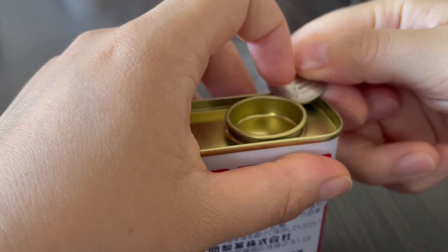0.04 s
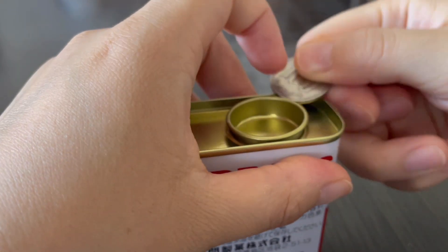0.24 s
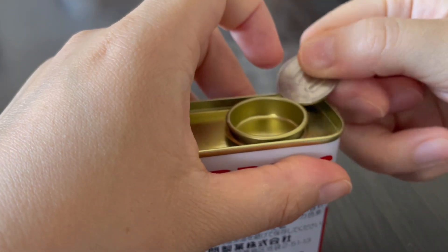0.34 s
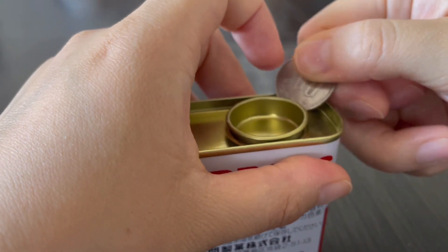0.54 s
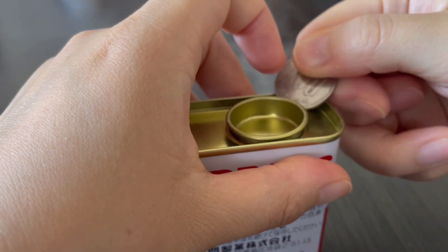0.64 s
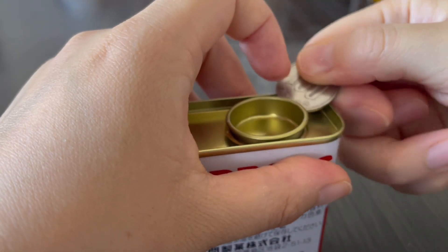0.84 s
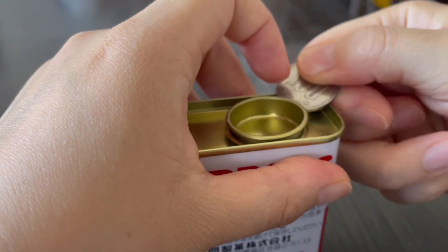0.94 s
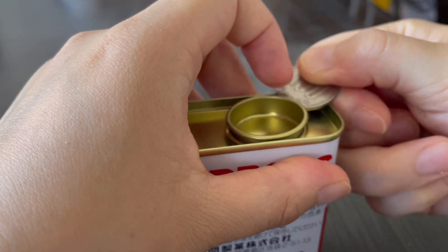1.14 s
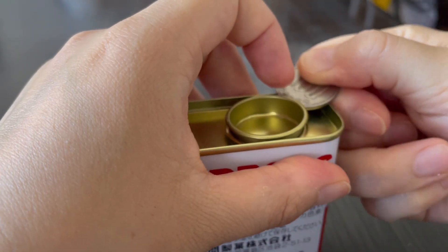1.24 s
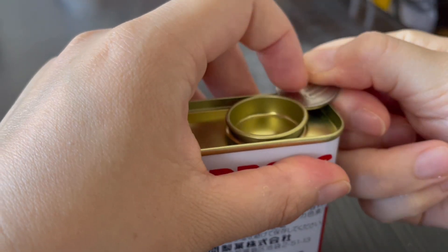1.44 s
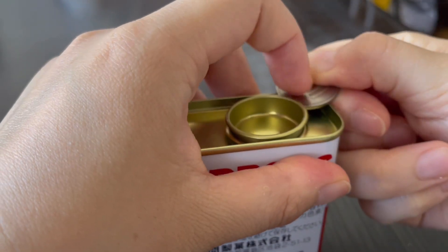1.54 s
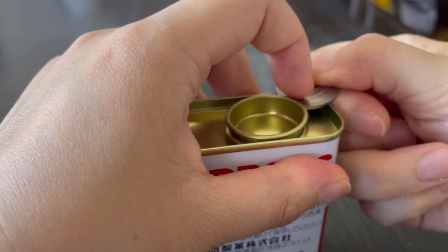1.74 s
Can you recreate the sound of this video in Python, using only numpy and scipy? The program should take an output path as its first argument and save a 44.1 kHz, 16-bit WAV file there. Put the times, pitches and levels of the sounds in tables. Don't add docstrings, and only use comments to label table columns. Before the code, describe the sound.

Close and dry, a coin edge settles faintly on thin metal, knocks, snaps sharply, drags in quick catching clicks, pauses, taps crisply, then leaves near silence with tiny touches in a small quiet room.

```python
import sys
import numpy as np
from scipy import signal
from scipy.io import wavfile
from scipy.ndimage import uniform_filter1d

SR = 44100
rng = np.random.default_rng(int(sys.argv[2]) if len(sys.argv) > 2 else 0)


def transcribe(signal):
    frames = np.atleast_2d(signal).T
    limited = np.clip(frames, -1, 1)
    pcm = np.round(limited * 32767).astype(np.int16)
    wavfile.write(sys.argv[1], SR, pcm)


def natural_amplitude(level_db):
    exponent = np.asarray(level_db, float) / 20
    return 10 ** exponent


N = 79380

# frequency in Hz, level in dB, t60 in seconds.
WALL = [(695, -16, 0.069), (1000, -13, 0.01188), (1330, -0.5, 0.0092), (1620, -4, 0.017),
        (1737, -4.5, 0.01), (1847, -6.5, 0.026), (2007, -4, 0.019), (2161, -5, 0.012), (2285, -8, 0.012),
        (3947, -8, 0.0059), (5944, -9, 0.0057), (7644, -12.5, 0.0063)]


def evened(x):
    return x / np.sqrt(np.mean(x ** 2) + 1e-20)


def read(points, hz):
    f, value = np.transpose(points)
    return np.interp(np.log(hz + 1), np.log(f + 1), value)


def add(mix, s, sound):
    part = mix[round(s * SR):][:len(sound)]
    part += sound[:len(part)]


def ring(modes, rise):
    t = np.arange(8192) / SR
    hz, db, t60 = np.transpose(modes)[:, :, None]
    treble_rise = 0.36
    swell = (1 - np.exp(-t / rise * (hz / 2000) ** treble_rise)) ** 2
    sign = (-1.) ** np.arange(len(modes))[:, None]
    return (sign * swell * natural_amplitude(db - 60 * t / t60) * np.sin(2 * np.pi * hz * t)).sum(0)


def contacts(rows, modes):
    out, t = np.zeros(N), np.arange(8192) / SR
    crack_t60, shimmer_t60, shimmer_db = 0.014, 0.21, -25
    band = signal.butter(4, [1100, 14300], "bandpass", fs=SR, output="sos")
    fall = natural_amplitude(-60 * t / crack_t60) + natural_amplitude(shimmer_db - 60 * t / shimmer_t60)
    fall = fall * (1 - np.exp(-t / 0.000067))
    for s, db, rise, crack_db in rows:
        crack = fall * signal.sosfilt(band, rng.standard_normal(len(t)))
        add(out, s, natural_amplitude(db) * (ring(modes, rise) + natural_amplitude(crack_db) * crack))
    return out


def scrape(pressure, modes, rise):
    out = np.zeros(N)
    grains_per_s, grain_db = 450, 0
    for mode in modes:
        size = natural_amplitude(grain_db * np.minimum(rng.exponential(1, N), 4)) * rng.choice([-1., 1.], N)
        grains = size * (rng.random(N) < grains_per_s / SR)
        out += signal.oaconvolve(grains, ring([mode], rise))[:N]
    s, db = np.transpose(pressure)
    return evened(out) * natural_amplitude(np.interp(np.arange(N) / SR, s, db, -120, -120))


def air():
    # frequency in Hz, density in dB per Hz.
    spectrum = [(7.1, -39.5), (12, -4.5), (59, -11.5), (82, -17.5), (186, -19), (301, -22.5), (502, -27.5),
                (13400, -38.5), (16000, -38.5)]
    level_db, hiss_top_hz, hiss_drop_db = -64.5, 15930, -17
    frames, hz = N // 512 + 6, np.fft.rfftfreq(2048, 1 / SR)
    a, b, patches = rng.standard_normal((frames, 1025, 3)).T
    patches = uniform_filter1d(patches, size=20, axis=0)
    patches = evened(uniform_filter1d(patches, size=8, axis=1))
    drop = hiss_drop_db * (hz > hiss_top_hz)
    z = (a + 1j * b) * natural_amplitude((read(spectrum, hz) + drop)[:, None] + 1.1 * patches)
    noise = signal.istft(z, nperseg=2048, noverlap=1536)[1][:N]
    return natural_amplitude(level_db) * evened(noise)


def jolts():
    times = [.046, .055, .082, .219, .2185, .32, .41, .632, .705, .7065, .708, .742, 1.37, 1.541]
    # peak in dB, pitch in Hz, length in seconds (to -30 dB).
    puffs = [(-56.5, 273, 0.054), (-60.5, 148, 0.081), (-56, 414, 0.079), (-51.5, 227, 0.04),
             (-33.5, 720, .015), (-57, 840, 0.019), (-63.5, 410, 0.039), (-59.5, 680, 0.017),
             (-54, 120.5, 0.029), (-50, 510, 0.035), (-57, 255, 0.029), (-60, 455, 0.069),
             (-60, 486, 0.042), (-62, 207, 0.059)]
    out, t = np.zeros(N), np.arange(4096) / SR
    for s, (db, hz, length) in zip(times, puffs):
        noise = rng.standard_normal(2 * len(t))
        b, a = signal.butter(2, [hz / 1.2, hz * 1.3], "bandpass", fs=SR)
        puff = signal.lfilter(b, a, noise)[len(t):]
        puff = natural_amplitude(-30 * t / length) * (1 - np.exp(-t * hz / 0.79)) * puff
        add(out, s, natural_amplitude(db) * puff / abs(puff).max())
    return out


def setting_down():
    # frequency in Hz, level in dB, t60 in seconds.
    rim = [(547.6, -8.5, .01), (896.6, -11, 0.012), (1350, -4.5, 0.01), (2110, -4.5, 0.0081),
           (4070, -11.5, 0.0072), (5650, -5.5, 0.0038), (9300, -8, 0.0039), (10200, -9, 0.0055),
           (13000, -14, .004)]
    # start in seconds, strength in dB, rise in seconds, crack in dB.
    landing = [
        (.0503, -58, 0.00094, 1),
    ]
    # time in seconds, level in dB.
    pressure = [(.049, -82), (.051, -60), (.066, -63), (.078, -60.5), (.093, -67.5), (.1, -72.5),
                (.13, -76.5), (.15, -90.5)]
    return contacts(landing, rim) + scrape(pressure, rim, 0.00048)


def brush():
    # time in seconds, level in dB.
    pressure = [(.07, -81), (.1, -71.5), (.15, -69.5), (.17, -63), (.215, -76), (.58, -93), (.6, -72),
                (.63, -77), (.65, -95)]
    return scrape(pressure, WALL, 0.0012)


def knocks():
    # frequency in Hz, level in dB, t60 in seconds.
    modes = [(438.2, -21, 0.013), (596, -15.5, 0.0121), (898, -18.5, 0.011), (1380, -8.5, 0.01216),
             (1871, 5.5, 0.011), (1950, -18, .04), (2673, -37, 0.0098), (3850, -20.5, .008),
             (4600, -24.5, 0.008), (5370, -19.5, 0.00813), (7164, -28, .008), (9940, -21, 0.005),
             (13570, -28.5, .008)]
    # start in seconds, strength in dB, rise in seconds, crack in dB.
    rows = [
        (.1524, -26, 0.00058, -21),
        (.1685, -56, .0012, -39),
        (.2146, -33, 0.001026, -32.5),
        (.2172, -29, 0.00065, -26),
        (.2202, -21, .0008, -41),
        (.49, -50, 0.0016, -42),
    ]
    return contacts(rows, modes)


def snap():
    # frequency in Hz, level in dB, t60 in seconds.
    modes = [(496.2, -20, 0.021), (697, -30.5, 0.081), (1406.5, -5.5, 0.011), (2150, -6.5, .012),
             (4070, -17.5, 0.013), (4905, -9, 0.0072), (5733, -13.5, 0.016), (7387, 4.5, 0.0053),
             (8950, -6, 0.015), (9750, 5, .0065), (10480, -4.5, 0.011), (11300, -5.5, 0.0082),
             (13000, -16, 0.012), (13800, -9, 0.01), (14490, -15, .008)]
    # start in seconds, strength in dB, rise in seconds, crack in dB.
    rows = [
        (.2191, -8, 0.00084, -11.5),
    ]
    # frequency in Hz, level in dB, t60 in seconds.
    lid = [(5784, 0, .073), (7639, 0.5, 0.1198), (7980, -6.5, 0.18), (9800, -7, .12), (10400, -7.5, .08),
           (12190, -7.5, .098), (12790, -6, .078), (13370, -6.5, 0.066), (13720, 1, .096), (14300, -2, .09),
           (15610, -9.5, .12)]
    # start in seconds, strength in dB, rise in seconds, crack in dB.
    lid_rings = [
        (.2195, -44.5, 0.000999, -41),
    ]
    return contacts(rows, modes) + contacts(lid_rings, lid)


def drag():
    # time in seconds, level in dB.
    pressure = [(.305, -67), (.314, -58), (.35, -58), (.37, -64), (.39, -66.5), (.42, -61.5), (.44, -88),
                (.46, -93)]
    return scrape(pressure, WALL, 0.0001)


def slips():
    # start in seconds, strength in dB, favoured pitch in Hz.
    rows = [(0.313, -51, 1450), (.3247, -44.5, 1550), (.3305, -52.5, 1950), (.336, -54.5, 1950),
            (.3420, -45, 2030), (.3482, -41.5, 2100), (.3525, -44.5, 1900), (.356, -46, 2150),
            (.361, -49, 2150), (.3770, -42.5, 2150), (0.381, -47, 2050), (.3850, -45, 2087),
            (.394, -50, 1950), (.4075, -42, 1440), (0.4085, -44.5, 1950), (0.4282, -42, 1350)]
    slope_db = 27.5
    out = np.zeros(N)
    for s, db, pitch in rows:
        modes = []
        for (hz, mode_db, t60), chance in zip(WALL, rng.standard_normal(len(WALL))):
            octaves = min(abs(np.log2(hz / pitch)), .5)
            modes.append((hz, mode_db + 2 * chance - slope_db * octaves, t60))
        add(out, s, natural_amplitude(db) * ring(modes, 0.000086))
    return out


def tick():
    # frequency in Hz, level in dB, t60 in seconds.
    modes = [(460, -15, 0.02), (689, -17.5, 0.1), (1000, 2, 0.011), (1347, -1, 0.022), (1853, 2, 0.026),
             (2150, 10.5, 0.011), (3710, -12.5, 0.023), (5830, 0.5, 0.016), (7000, -8, 0.0087),
             (8080, -14, 0.088), (10040, -3.5, 0.0069), (12800, -27, .012)]
    # start in seconds, strength in dB, rise in seconds, crack in dB.
    rows = [
        (.4218, -41.5, 0.00056, -5.5),
    ]
    return contacts(rows, modes)


def tap():
    # frequency in Hz, level in dB, t60 in seconds.
    modes = [(391.4, -15, 0.01), (785, -28, 0.013), (1457, 0, 0.0097), (1950, -4, 0.0066),
             (2600, -6, 0.0062), (3940, -9, 0.014), (4810, -10, 0.013), (5660, -9.5, 0.015),
             (6632, -14.5, 0.025), (8080, -7, 0.023), (9000, 5, 0.0061), (9550, -3.5, 0.014),
             (11870, -9.5, 0.012), (13000, -0.5, 0.0047), (13470, -19, 0.016)]
    # start in seconds, strength in dB, rise in seconds, crack in dB.
    rows = [
        (.7072, -25, 0.0006, -7.5),
    ]
    # frequency in Hz, level in dB, t60 in seconds.
    coin = [(4097, -6, .13), (8090, -5, .09), (8160, 1, 0.12), (9330, -3, .1), (9480, 4, 0.13),
            (9593, 1, .12), (11500, -5, .09), (13400, 3, .055)]
    # start in seconds, strength in dB, rise in seconds, crack in dB.
    coin_rings = [
        (.7074, -53, 0.00087, -42),
    ]
    return contacts(rows, modes) + contacts(coin_rings, coin)


def prick():
    # frequency in Hz, level in dB, t60 in seconds.
    modes = [(13400, 0, 0.0087)]
    # start in seconds, strength in dB, rise in seconds, crack in dB.
    rows = [
        (1.037, -55, .0005, -22.5),
    ]
    return contacts(rows, modes)


def graze():
    # frequency in Hz, level in dB, t60 in seconds.
    modes = [(1150, -4, 0.016), (1740, -2, 0.0099), (7300, 1.5, 0.0051), (8440, -1, 0.0084),
             (9500, 0.5, 0.02), (10700, -4, 0.0069), (12000, -1, 0.0073), (14000, -4.5, 0.0087)]
    # start in seconds, strength in dB, rise in seconds, crack in dB.
    rows = [
        (1.3642, -50.5, 0.00027, -15),
        (1.3722, -68, 0.00036, 4),
    ]
    return contacts(rows, modes)


def nudge():
    # frequency in Hz, level in dB, t60 in seconds.
    modes = [(329, 15.5, 0.0055), (733, -1.5, 0.0048), (1497, -5.5, 0.021), (2200, -7, 0.0043),
             (4050, -8.5, 0.012), (5450, -9, 0.007)]
    # start in seconds, strength in dB, rise in seconds, crack in dB.
    rows = [
        (1.5425, -49.5, 0.00066, -21),
    ]
    return contacts(rows, modes)


def scattered(x):
    share, width_s = 0.59, .0015
    window = np.hanning(round(width_s * SR) + 3)
    flutter = evened(signal.oaconvolve(rng.standard_normal(N), window, "same"))
    return x * (np.sqrt(1 - share) + np.sqrt(share) * flutter)


def room(x):
    # frequency in Hz, t60 in seconds.
    decay = [(250, 0.54), (700, 0.3), (2000, .18), (5000, 0.14), (10000, 0.17), (15000, .15)]
    # delay in seconds, level in dB.
    echoes = [
        (.0065, -31),
        (.0108, -30.5),
        (.0163, -26),
        (.0178, -27),
    ]
    tail_db, tail_start_s = -17, 0.0055
    taps = np.zeros(16384)
    at = np.arange(0, 16360, 20) + rng.integers(0, 20, 818)
    taps[at] = rng.choice([-1., 1.], len(at))
    hz, t, z = signal.stft(taps, SR, nperseg=256)
    tail = signal.istft(z * natural_amplitude(-60 * t / read(decay, hz)[:, None]), SR, nperseg=256)[1]
    reply = np.zeros(SR // 2)
    add(reply, tail_start_s, natural_amplitude(tail_db) * tail / np.linalg.norm(tail))
    for s, db in echoes:
        add(reply, s, natural_amplitude([db]))
    return signal.fftconvolve(x, reply)[:N]


def scene():
    tin = setting_down() + brush() + knocks() + snap() + drag() + slips()
    tin += tick() + tap() + prick() + graze() + nudge()
    b, a = signal.iirnotch(15040, 9, SR)
    reverberation = signal.lfilter(b, a, room(scattered(tin)))
    return (tin + reverberation + jolts() + air())[None]


def top_cut(x):
    return signal.sosfilt(signal.butter(12, 16430, fs=SR, output="sos"), x)


def record(dry):
    low_pass = signal.firwin(255, 16220, window=("kaiser", 9), fs=SR)
    mix = signal.oaconvolve(dry, low_pass[None], "same")
    return top_cut(mix)


dry = scene()
out = record(dry)
transcribe(out)
```